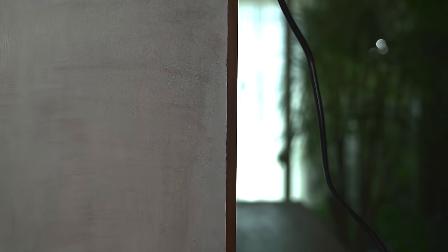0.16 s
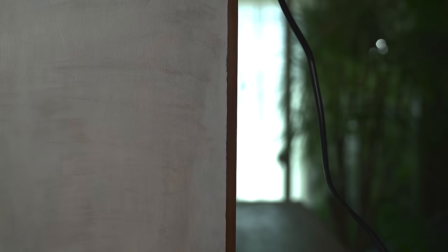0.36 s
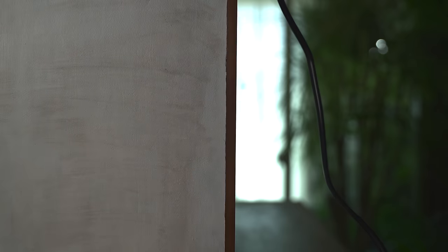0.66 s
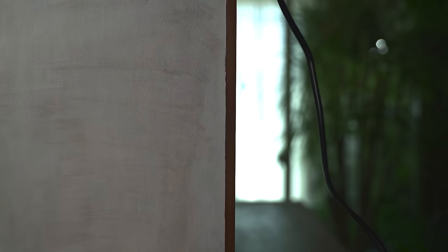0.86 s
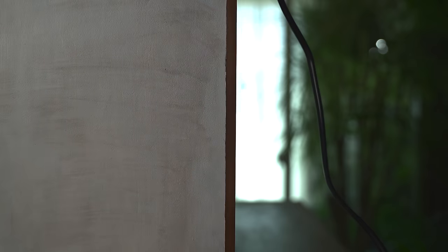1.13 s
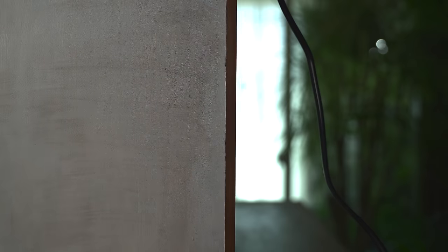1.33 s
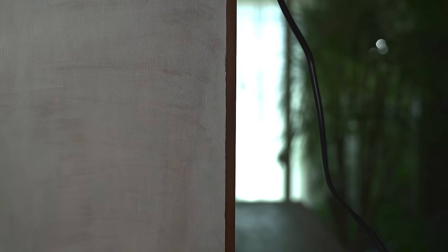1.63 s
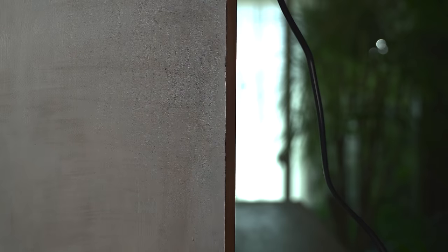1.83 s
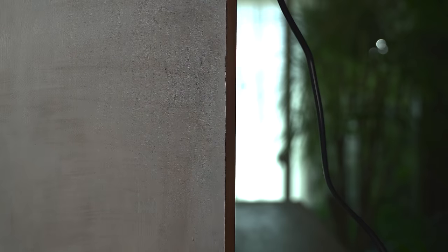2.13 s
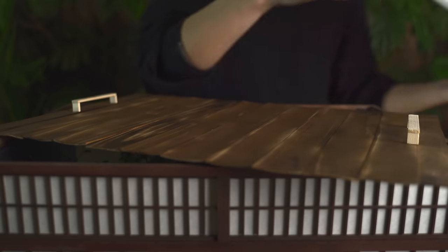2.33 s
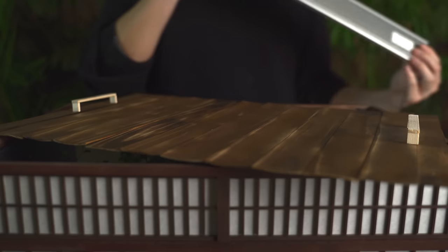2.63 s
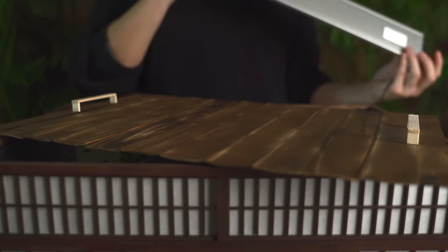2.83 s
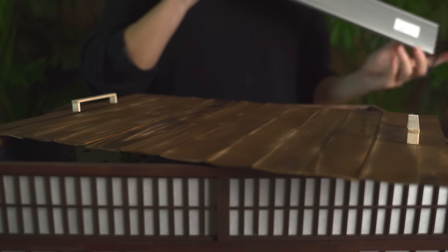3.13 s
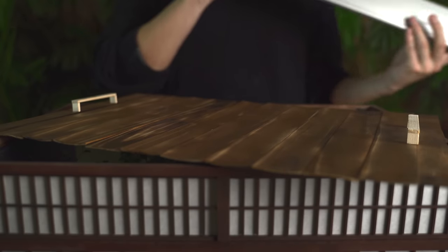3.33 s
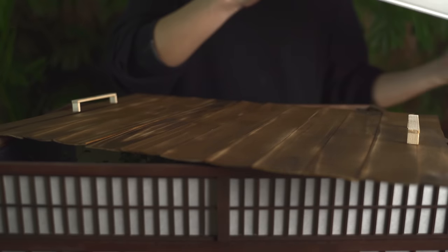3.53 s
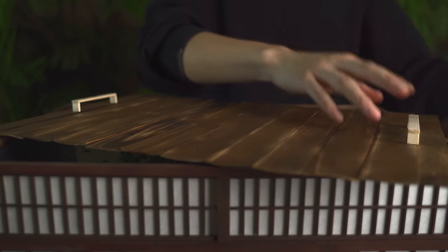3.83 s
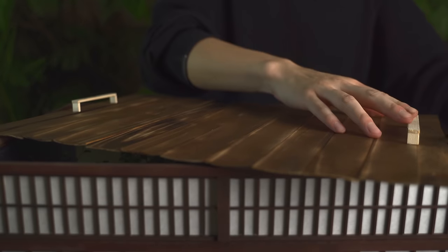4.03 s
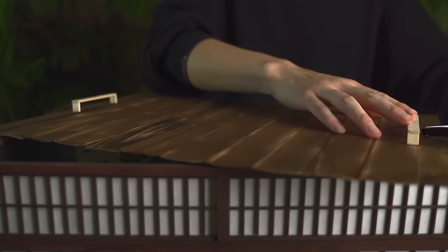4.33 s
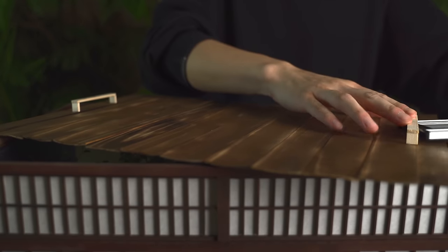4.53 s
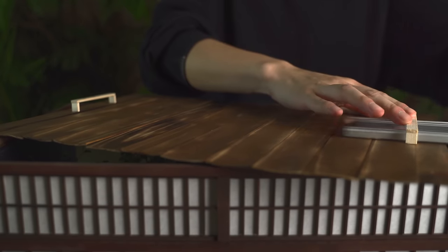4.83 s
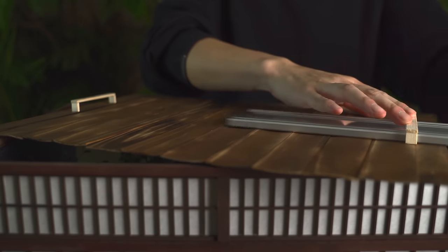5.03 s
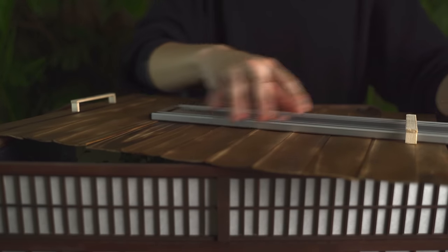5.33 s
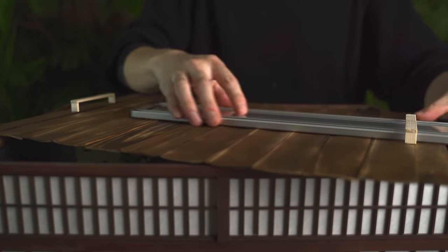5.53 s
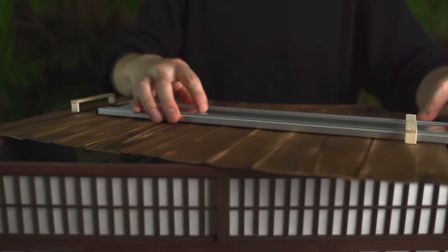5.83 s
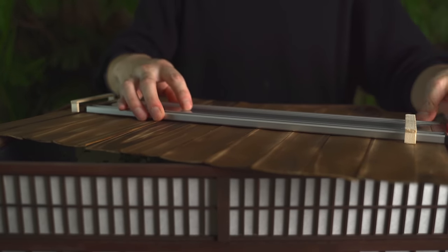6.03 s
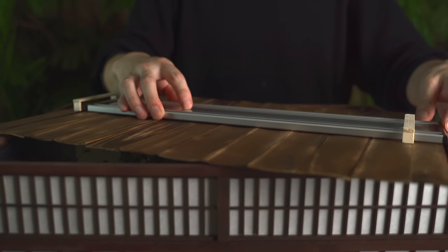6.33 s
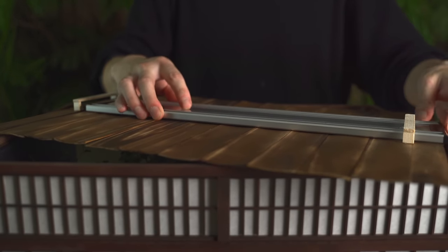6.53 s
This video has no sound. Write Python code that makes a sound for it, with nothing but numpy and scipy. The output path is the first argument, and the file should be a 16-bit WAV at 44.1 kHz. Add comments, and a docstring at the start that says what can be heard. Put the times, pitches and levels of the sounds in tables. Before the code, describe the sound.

A small wooden door rumbles to a knocking stop and rocks softly, then sleeves rustle and a light metal bar knocks and scrapes across thin planks.

```python
"""Wooden sliding door, then a lamp bar on planks

A small wooden door rumbles and rubs to its stop, knocks, and rocks in its groove in a small room.
Sleeves rustle as a light metal lamp bar is handled, set on a roof of thin planks and pushed along it.
Struck wood and metal are decaying modes plus sharp noisy contacts; sliding is noise from tiny slips.
The bar hisses, rasps and squeaks on the grain and knocks over the plank edges, above a quiet room tone.
"""
import sys
import numpy as np
from scipy import signal
from scipy.fft import rfft, irfft, next_fast_len
from scipy.io import wavfile
from scipy.ndimage import uniform_filter1d, map_coordinates

SR = 44100
rng = np.random.default_rng(int(sys.argv[2]) if len(sys.argv) > 2 else 0)


def waveform_to_disk(signal):
    """Save audio, clipped to [-1, 1], as 16-bit WAV at the path in sys.argv[1]."""
    frames = np.transpose(np.atleast_2d(signal))
    scaled = np.clip(frames, -1, 1) * 32767
    samples = np.round(scaled).astype(np.int16)
    wavfile.write(sys.argv[1], SR, samples)


N = 293706
TIME = np.arange(N) / SR  # seconds through the scene
AGE = TIME[:SR // 2]  # seconds since the start of a short sound

# The quiet room's tone. Each row: frequency in Hz, relative density in dB per Hz.
ROOM_TONE_SPECTRUM = [(12, -12), (20, -9), (49, -5), (101, -5), (177, 0), (293, -13.5), (357, -5.5),
                      (422, -14), (2670, -28), (3950, -26.5), (6720, -31.5), (13900, -31.5), (16000, -33)]
# How long the room rings. Each row: frequency in Hz, t60 in seconds.
ROOM_DECAY = [(150, 0.45), (400, 0.33), (1000, 0.4), (3500, 0.31), (7000, 0.32), (14000, 0.29)]
# The door runs in its groove. Each row: time in seconds, rumble in dB, rub in dB, both before their trims.
DOOR_RUN_LEVELS = [(0.0, -18, -36.5), (0.125, -21, -37.5), (0.155, -15, -44.5), (0.262, -30, -44.5),
                   (0.34, -44, -60), (0.42, -54, -72)]
# Colour of the door's and planks' rumble. Each row: frequency in Hz, relative density in dB per Hz.
RUMBLE_SPECTRUM = [(40, -55), (110, -29.5), (190, 3.5), (290, 2), (360, -2), (480, -2), (800, -10),
                   (1500, -17), (4000, -65.5)]
# Colour of the door's rub on its frame. Each row: frequency in Hz, relative density in dB per Hz.
RUB_SPECTRUM = [(400, -19), (1200, 5.5), (2500, -4.5), (4200, 1), (5500, -10.5), (8000, -19), (11000, -25),
                (16000, -34.5)]
# Door knocks. Each row: start in seconds, thud in dB, crack in dB relative to the thud, favoured pitch in Hz.
DOOR_KNOCKS = [(.044, -20.5, -31, 260), (.1345, -8.5, -16.5, 410), (.142, -17, -29, 250),
               (.16, -15, -29, 474), (.218, -18, -19, 398), (.232, -16.5, -31, 294), (.703, -30, -1.5, 400),
               (.709, -18.5, -23, 215)]
# Modes of the door. Each row: frequency in Hz, relative level in dB, t60 in seconds.
DOOR_MODES = [(221.5, -9, 0.13), (277, 8.5, 0.0077), (284, -2.5, 0.081), (351, -2, 0.028),
              (467, -2.5, 0.051), (570, -4.5, 0.048), (730, -3, 0.062)]
# Woody clack of door and roof. Each row: frequency in Hz, relative density in dB per Hz.
WOOD_CLACK = [(40, -65), (150, -27.5), (400, -2.5), (650, 7.5), (1100, 3.5), (1700, -3.5), (2500, -10),
              (4000, -37), (8000, -40)]
# Bright crack of the door. Each row: frequency in Hz, relative density in dB per Hz.
DOOR_CRACK = [(800, -47), (2000, -3), (2900, -3), (3400, 0.5), (4000, -4.5), (4600, -7), (5800, -14.5),
              (8000, -28.5), (11000, -29), (16000, -34.5)]
# Thin panels radiate little deep bass. Each row: frequency in Hz, gain in dB.
PANEL_RADIATION = [(20, -55), (70, -7), (125, -7.5), (185, 9), (1500, 9.5), (5000, -8.5)]
# Bouts of rocking. Each row: start in seconds, end in seconds, time between thumps in seconds,
# level in dB before side and scatter.
ROCKING_BOUTS = [(.436, .67, 0.096, -20), (.994, 1.58, .0922, -31), (1.617, 2.12, .091, -41)]
# The two sides the panel rocks onto in turn. Each row: level offset in dB, settled pitch in Hz before
# detuning, t60 in seconds.
ROCK_SIDES = [(0.5, 166, 0.11), (-4, 152.2, 0.13)]
# Faint dry ticks of the door frame. Each row: start in seconds, level in dB before the trim, pitch in Hz.
FRAME_TICKS = [(.487, -33.5, 1260), (.534, -42, 754), (1.449, -41, 795), (1.619, -36, 900)]
# Short scuffs of wood and fingers. Each row: start in seconds, length in seconds, level in dB.
SCUFFS = [(0.582, 0.095, -53.5), (0.683, 0.047, -38), (2.226, .06, -54.5), (3.953, 0.0696, -31),
          (4.438, 0.09, -31), (4.773, 0.037, -34), (4.856, 0.04, -26.5), (6.196, 0.067, -47),
          (6.32, 0.064, -27.5)]
# Colour of scuffs and cloth crackle. Each row: frequency in Hz, relative density in dB per Hz.
SCUFF_SPECTRUM = [(40, -35), (100, 5), (400, 8), (950, 10.5), (2000, 2.5), (2900, -1), (3900, 4),
                  (5500, -12.5), (8800, -9.5), (16000, -29.5)]
# Arm movements. Each row: fastest moment in seconds, half length in seconds, level in dB.
ARM_MOVES = [(2.0, .35, -66.5), (2.26, 0.17, -55), (2.57, 0.15, -51.5), (2.893, 0.13, -45),
             (3.065, 0.067, -42.5), (3.296, 0.19, -49), (3.695, 0.2, -50.5), (3.997, 0.14, -43),
             (4.405, 0.062, -40.5), (6.473, 0.33, -48)]
# Colour of rustling cloth. Each row: frequency in Hz, relative density in dB per Hz.
CLOTH_SPECTRUM = [(40, -26), (120, -1.5), (250, 4.5), (500, 4), (1000, -0.5), (1700, -4), (3000, -3),
                  (4400, 0), (5700, -12.5), (8500, -18.5), (12000, -25.5), (16000, -37)]
# Soft bumps of an arm. Each row: start in seconds, length in seconds, level in dB.
ARM_BUMPS = [(2.91, 0.078, -50)]
# Dull colour of those bumps. Each row: frequency in Hz, relative density in dB per Hz.
BUMP_SPECTRUM = [(25, -19), (65, 2), (120, -1), (200, -22), (800, -60)]
# Lamp bar clicks. Each row: start in seconds, thud in dB, crack in dB relative to the thud, favoured pitch in Hz.
BAR_CLICKS = [(2.403, -36, 3, 1620), (2.407, -28.5, -4, 1190), (2.539, -45.5, 3.5, 1400),
              (3.156, -38, -7, 1000), (3.189, -35, 6, 580), (3.298, -46, 14.5, 1670),
              (3.357, -46, -4, 1100), (3.496, -38, -20, 1100), (3.537, -43, 5, 1340),
              (3.948, -14, -6.5, 515), (5.97, -37.5, 11.5, 1380), (6.213, -48, 12, 690)]
# Modes of the bar and the wood. Each row: frequency in Hz, relative level in dB, t60 in seconds.
BAR_MODES = [(435, 13, 0.03), (545, 4.5, 0.062), (607, 11, 0.047), (1013, -2, 0.055), (1054, 18.5, 0.016),
             (1265, -19, 0.023), (1752, 2, 0.069)]
# Clack of the bar. Each row: frequency in Hz, relative density in dB per Hz.
BAR_CLACK = [(150, -44), (450, -2), (850, 2.5), (1200, 6.5), (1800, -4), (2500, -8), (4000, -13.5),
             (8000, -23.5)]
# Crack of the bar's metal shell. Each row: frequency in Hz, relative density in dB per Hz.
BAR_CRACK = [(800, -18), (1800, -9), (2600, -0.5), (3100, 1), (3700, 4.5), (4450, 3), (5500, -9.5),
             (7500, -9.5), (11000, -25), (16000, -36)]
# Roof knocks. Each row: start in seconds, thud in dB, crack in dB relative to the thud, favoured pitch in Hz.
ROOF_KNOCKS = [(3.946, -13.5, -23, 580), (3.977, -22, -8, 300), (4.218, -12.5, -16.5, 545),
               (4.241, -19, -21, 580), (4.453, -20, -12, 444), (4.487, -12.5, -12.5, 286),
               (4.682, -22, -14, 356), (4.749, -22, -16.5, 397), (4.87, -17.5, -7, 422),
               (4.959, -12, -4, 360), (4.98, -17.5, -23, 380), (5.041, -25, -25, 192),
               (5.095, -25.5, -21, 417), (5.174, -20.5, -16, 501), (5.186, -12, -26, 457),
               (5.302, -8, -15.5, 447), (5.323, -7.5, -19, 245), (5.412, -31, -3, 600),
               (5.535, -12.5, -12.5, 600), (5.581, -16, -15, 202), (5.598, -21, -7.5, 295),
               (5.753, -34, -9, 300), (5.823, -20.5, -2.5, 223), (6.056, -16, -9.5, 222),
               (6.299, -32.5, -18.5, 170), (6.473, -36.5, -25, 257)]
# Modes of the plank roof. Each row: frequency in Hz, relative level in dB, t60 in seconds.
ROOF_MODES = [(144, -7, 0.49), (172, -0.5, 0.35), (213.7, 3, 0.077), (240, -6, 0.28), (298, 5.5, 0.091),
              (343, -5, 0.13), (403.7, -5, 0.11), (477, 8.5, 0.051), (543.4, 0, 0.032), (669, -23, 0.047),
              (861, -4.5, 0.16), (1140, -29, 0.27), (1516, -1, 0.087)]
# Bright crack of the roof. Each row: frequency in Hz, relative density in dB per Hz.
ROOF_CRACK = [(800, -29.5), (2200, 1), (3000, -1), (3700, 8), (4500, -2.5), (5500, -14.5), (7500, -7),
              (11000, -19), (16000, -19)]
# The bar slides. Each row: time in seconds, hiss in dB before its trim.
SLIDE_LEVELS = [(4.33, -97), (4.416, -55), (4.458, -28.5), (4.482, -31.5), (4.508, -51.5), (4.74, -46.5),
                (4.786, -28), (4.918, -32.5), (4.98, -24.5), (5.266, -29.5), (5.4, -38), (5.442, -27),
                (5.466, -35.5), (5.498, -30.5), (5.81, -40.5), (5.82, -35), (5.888, -37.5), (6.056, -37),
                (6.082, -56), (6.17, -72.5)]
# Colour of the sliding hiss. Each row: frequency in Hz, relative density in dB per Hz.
HISS_SPECTRUM = [(2000, -25), (3200, -9), (3850, 6), (4600, 2), (5500, 1), (7000, 4), (8200, 8), (8800, 9),
                 (9400, 4), (11000, 1), (12400, 1), (14000, -4.5), (16000, -14)]
# Rasp in the bar's resonance. Each row: frequency in Hz, relative density in dB per Hz.
RASP_SPECTRUM = [(300, -11.5), (900, 6), (1500, 1.5), (2700, 2), (3300, 7.5), (3850, 8.5), (4400, 3.5),
                 (5200, -8), (9000, -26)]
# The bar sticks and squeaks. Each row: start in seconds, length in seconds, start pitch in Hz,
# end pitch in Hz, level in dB.
SQUEAKS = [(4.42, 0.07, 3740, 4090, -35), (4.429, 0.034, 3160, 3240, -35.5),
           (4.441, 0.045, 6460, 8500, -34), (4.442, 0.012, 9300, 10500, -36.5),
           (4.775, 0.058, 4250, 3640, -27.5), (4.846, .035, 3590, 3760, -22),
           (4.858, 0.0316, 3260, 2560, -28), (5.009, 0.03, 3650, 3900, -30), (5.971, .06, 3460, 4270, -30)]

BLOW_DB, SPOT_HZ = -17, 424  # a middling blow, and the favoured pitch of a middling spot
CLACK_DB_PER_OCTAVE = 4.5  # spots with a higher favoured pitch clack more
ROCK_SAG, ROCK_SAG_S = 0.064, 0.026  # share a thump starts sharp, time constant of its settling in s
CRACKLES_PER_S, CRACKLE_DB = 45, -6  # snaps of cloth folds; level relative to the rustle
CRUISE_DB = -29.5  # slide level, before its trim, that counts as a steady push
RASP_GROWS, RUMBLE_GROWS = 0.44, 0.25  # dB gained for each dB of hiss
TOP_HZ = 15950  # band limit


def amp(db):
    """Decibels to gain."""
    return 10 ** (np.asarray(db) / 20)


def unit(x):
    """Scale to rms 1."""
    return x / np.sqrt(np.mean(x ** 2) + 1e-20)


def burst(x):
    """Scale a short sound to the energy of 10 ms at rms 1."""
    return x / np.sqrt(np.sum(x ** 2) / (SR * .01) + 1e-20)


def along(points, hz):
    """Read (Hz, value) points on a log frequency axis."""
    f, v = np.transpose(points)
    return np.interp(np.log(hz + 1), np.log(f), v)


def gains(rows):
    """Draw one smoothed gain curve for each dB column, silent outside the rows."""
    s, *columns = np.transpose(rows)
    active = (TIME > s[0] - .03) * (TIME < s[-1] + .03)
    return [uniform_filter1d(amp(np.interp(TIME, s, db)) * active, size=200) for db in columns]


def fade(t60):
    """Exponential decay, 60 dB down after t60 seconds."""
    return np.exp(-np.log(1000) * AGE / max(t60, 1e-3))


def stroke(length, edge):
    """A short envelope with soft edges, both times in seconds."""
    return np.clip(AGE / edge, 0, 1) * np.clip((length - AGE) / edge, 0, 1)


def wobble(rate):
    """A smooth random curve, rate knots a second."""
    knots = rng.standard_normal(int(N * rate / SR) + 4)
    return map_coordinates(knots, [TIME * rate])


def add(track, s, x):
    """Mix x into the track at s seconds."""
    part = track[max(round(s * SR), 0):][:len(x)]
    part += x[:len(part)]


def colour(x, spectrum):
    """Minimum-phase filter: it takes on the spectrum without sounding ahead of its input."""
    m = 2 * next_fast_len(len(x) // 2 + 4096)
    magnitude = amp(along(spectrum, np.fft.rfftfreq(m, 1 / SR)))
    cepstrum = irfft(np.log(magnitude), m)
    # fold the cepstrum onto positive time
    cepstrum[1:m // 2] *= 2
    cepstrum[m // 2 + 1:] = 0
    return irfft(rfft(x, m) * np.exp(rfft(cepstrum)), m)[:len(x)]


def room(x):
    """The small room's answer: decaying noise of unit energy, each band fading at its own rate."""
    hz, t, z = signal.stft(rng.standard_normal(SR // 2), SR, nperseg=256)
    decay = np.exp(-np.log(1000) * t / along(ROOM_DECAY, hz)[:, None])
    tail = signal.istft(z * decay, SR, nperseg=256)[1][:len(AGE)]
    tail = tail * (1 - np.exp(-(AGE / 0.0088) ** 2))  # the walls take a moment to answer
    return signal.fftconvolve(x, tail / np.linalg.norm(tail))[:len(x)]


def friction(spectrum, slips, spread_db, patchy_db):
    """Tiny uneven slips, so many a second, over steady noise; their resonances drift in patches; rms 1."""
    slipping = rng.random(N) < slips / SR
    strength = amp(spread_db * np.clip(rng.standard_normal(N), -2, 2))
    grains = slipping * rng.standard_normal(N) * strength
    z = signal.stft(unit(grains) + 1.92 * rng.standard_normal(N), nperseg=512)[2]
    # smooth random gains across frequency, then across time
    patches = uniform_filter1d(rng.standard_normal(z.shape), size=4, axis=0)
    patches = uniform_filter1d(patches, size=9, axis=1)
    patchy = signal.istft(z * amp(patchy_db * unit(patches)), nperseg=512)[1][:N]
    return unit(colour(patchy, spectrum))


def contact(spectrum, t60, chatter):
    """One sharp push with a brief decaying chatter behind it."""
    push = chatter * unit(rng.standard_normal(len(AGE)) * fade(t60)) / np.sqrt(len(AGE))
    push[0] += 1
    return burst(colour(push, spectrum))


def ring(modes, favoured_hz, focus_db):
    """The modes of a struck body start together; the spot that is hit favours those near its pitch."""
    swing = np.zeros(len(AGE))
    for hz, level, t60 in modes:
        scatter_db, detune = rng.normal(0, 1.5), rng.normal(1, .01)
        spot_db = -focus_db * abs(np.log2(hz / favoured_hz))  # focus_db is the loss per octave
        gain = amp(level + spot_db + scatter_db)
        swing += gain * fade(t60) * np.sin(2 * np.pi * hz * detune * AGE)
    return burst(colour(swing, PANEL_RADIATION))


def knocks(rows, modes, clack_spectrum, crack_spectrum, focus_db, clack_db, clack_grows,
           room_db, clack_t60, crack_t60, chatter, top_per_db):
    """Each blow rings the body; a clack and the top end vary with force, a crack lies on top, the room answers."""
    track = np.zeros(N)
    for s, db, crack_db, favoured_hz in rows:
        force_db = db - BLOW_DB
        thud = ring(modes, favoured_hz, focus_db)
        spot_db = CLACK_DB_PER_OCTAVE * np.log2(favoured_hz / SPOT_HZ)
        clack_gain = amp(clack_db + clack_grows * force_db + spot_db)
        crack_gain = amp(crack_db)
        clack = clack_gain * contact(clack_spectrum, clack_t60, chatter)
        crack = crack_gain * contact(crack_spectrum, crack_t60, chatter)
        # the room is fed the bare pushes, without chatter
        diffuse = room(thud + clack_gain * contact(clack_spectrum, clack_t60, 0))
        diffuse = diffuse + room(crack_gain * contact(crack_spectrum, crack_t60, 0))
        top_end = [(4500, 0), (14000, top_per_db * force_db)]
        add(track, s, amp(db) * colour(thud + clack + crack + amp(room_db) * diffuse, top_end))
    return track


def room_tone():
    """Steady coloured noise: low rumble and faint hiss of the quiet room."""
    return amp(-56.5) * unit(colour(rng.standard_normal(N), ROOM_TONE_SPECTRUM))


def door_run():
    """The door rumbles in its groove and rubs along the frame, both as friction noise."""
    rumble_gain, rub_gain = gains(DOOR_RUN_LEVELS)
    rumble = rumble_gain * friction(RUMBLE_SPECTRUM, slips=1200, spread_db=2.0, patchy_db=3.0)
    rub = rub_gain * friction(RUB_SPECTRUM, slips=2500, spread_db=0.5, patchy_db=4.5)
    return amp(-5.5) * rumble + amp(3.0) * rub


def door_knocks():
    """Blows ring the wooden door's short modes."""
    return knocks(DOOR_KNOCKS, DOOR_MODES, WOOD_CLACK, DOOR_CRACK, focus_db=11.5, clack_db=-10.5,
                  clack_grows=0.089, room_db=-5.5, clack_t60=0.024, crack_t60=0.025,
                  chatter=3.3, top_per_db=-0.32)


def door_rocking():
    """The loose panel rocks side to side in soft low thumps, ten or eleven a second, each sagging in pitch."""
    track = np.zeros(N)
    for start, end, period, db in ROCKING_BOUTS:
        for k, s in enumerate(np.arange(start, end, period)):
            side_db, hz, t60 = ROCK_SIDES[k % 2]
            scatter_db, detune = rng.normal(0, 1), rng.normal(1, .02)
            pitch = hz * detune * (1 + ROCK_SAG * np.exp(-AGE / ROCK_SAG_S))
            phase = 2 * np.pi * np.cumsum(pitch) / SR
            panel = np.sin(phase) * fade(t60) * (1 - np.exp(-AGE / 0.0028))
            sway = np.sin(2 * np.pi * 85 * AGE) * fade(0.052) * (1 - np.exp(-AGE / 0.0048))
            add(track, s, amp(db + side_db + scatter_db) * (panel + amp(-2.0) * sway))
    return track + amp(-9) * room(track)


def door_ticks():
    """The door frame ticks faintly: dry contacts in a band around each pitch."""
    track = np.zeros(N)
    for s, db, hz in FRAME_TICKS:
        # as read by along, the band steps up at a quarter of the pitch
        band = [(hz / 4, -25), (hz / 6.6, -7), (hz, 0), (hz * 1.11, -7), (hz * 3, -35)]
        add(track, s, amp(db - 14.5) * contact(band, t60=0.027, chatter=0.92))
    return track + amp(-9) * room(track)


def scuffs():
    """Wood and fingers scuff broadly: short strokes of grainy noise."""
    track = np.zeros(N)
    for s, length, db in SCUFFS:
        grain = rng.standard_normal(len(AGE)) * rng.standard_normal(len(AGE))
        add(track, s, amp(db) * stroke(length, edge=0.0041) * unit(colour(grain, SCUFF_SPECTRUM)))
    return track + amp(-8.5) * room(track)


def sleeves():
    """Cloth friction swells and ebbs with each arm movement; folds crackle, and an arm bumps dully."""
    power = sum(amp(db) ** 2 * np.exp(-2 * ((TIME - s) / half) ** 2) for s, half, db in ARM_MOVES)
    folds = (rng.random(N) < CRACKLES_PER_S / SR) * rng.uniform(-0.59, 1, N)
    snap = contact(SCUFF_SPECTRUM, t60=0.032, chatter=1)
    crackle = unit(signal.fftconvolve(folds, snap)[:N])
    rustle = friction(CLOTH_SPECTRUM, slips=4100, spread_db=4.0, patchy_db=-2.5)
    rustle = amp(1.55 * wobble(25)) * rustle
    track = np.sqrt(power) * (rustle + amp(CRACKLE_DB) * crackle)
    for s, length, db in ARM_BUMPS:
        bump = unit(colour(rng.standard_normal(len(AGE)), BUMP_SPECTRUM))
        add(track, s, amp(db) * stroke(length, edge=0.023) * bump)
    return track


def bar_clicks():
    """Light blows ring the metal bar's modes."""
    return knocks(BAR_CLICKS, BAR_MODES, BAR_CLACK, BAR_CRACK, focus_db=19, clack_db=-3.5,
                  clack_grows=-0.029, room_db=-2, clack_t60=0.037, crack_t60=0.048,
                  chatter=4.9, top_per_db=0.21)


def roof_knocks():
    """The bar knocks on the roof and over its plank edges, ringing the thin planks."""
    return knocks(ROOF_KNOCKS, ROOF_MODES, WOOD_CLACK, ROOF_CRACK, focus_db=8.5, clack_db=-6.5,
                  clack_grows=0.12, room_db=-11, clack_t60=0.056, crack_t60=0.025,
                  chatter=2.64, top_per_db=-.1)


def bar_slide():
    """Metal on wood grain: one push drives a hiss, a rasp in the bar, a rumble and small ticks in the planks."""
    hiss_gain, = gains(SLIDE_LEVELS)
    push = np.abs(hiss_gain) / amp(CRUISE_DB)  # 1 at a steady push
    touching = push > 1e-4
    rasp_drive = touching * push ** RASP_GROWS
    rumble_drive = touching * push ** RUMBLE_GROWS
    pressure = amp(1.3 * wobble(45) + 1.0 * wobble(220))  # stick and slip
    hiss = amp(-1.0) * hiss_gain * friction(HISS_SPECTRUM, slips=6900, spread_db=3, patchy_db=3.0)
    rasp = amp(-32) * rasp_drive * friction(RASP_SPECTRUM, slips=4200, spread_db=-4.5, patchy_db=1.0)
    # ridges of the grain tap the planks, 110 a second on average
    ridges = (rng.random(N) < 110 / SR) * rng.uniform(-1.55, 1, N)
    tap = ring(ROOF_MODES, favoured_hz=503, focus_db=14)
    tap = tap + amp(-5.0) * contact(WOOD_CLACK, t60=0.038, chatter=0.12)
    ticks = amp(-38.5) * signal.fftconvolve(ridges * rasp_drive, tap)[:N]
    rumble = amp(-38) * rumble_drive * friction(RUMBLE_SPECTRUM, slips=2800, spread_db=8, patchy_db=6)
    return pressure * (hiss + rasp) + ticks + rumble


def squeaks():
    """Where the bar catches it squeaks: a gliding sine blurred by noise into a narrow band."""
    track = np.zeros(N)
    blur_spectrum = [(120, -0.5), (400, -7.5), (1500, -48), (4000, -44)]
    for s, length, start_hz, end_hz, db in SQUEAKS:
        pitch = np.interp(AGE, [0, length], [start_hz, end_hz])
        phase = 2 * np.pi * np.cumsum(pitch) / SR
        blur = colour(rng.standard_normal(len(AGE)), blur_spectrum)  # uneven slips widen the line
        add(track, s, amp(db) * stroke(length, edge=0.0016) * unit(blur * np.sin(phase)))
    return track + amp(-8.5) * room(track)


def scene():
    """Mix room, door, sleeves, lamp bar and roof to one channel."""
    door = door_run() + door_knocks() + door_rocking() + door_ticks()
    handling = scuffs() + sleeves() + bar_clicks()
    on_roof = roof_knocks() + bar_slide() + squeaks()
    return (room_tone() + door + handling + on_roof)[None]


def record(dry):
    """The hardest knocks flatten smoothly towards full scale; nothing is kept above the band limit."""
    held = dry / (1 + np.abs(dry) ** 6) ** (1 / 6)
    m = next_fast_len(N + SR // 2)
    in_band = np.fft.rfftfreq(m, 1 / SR) < TOP_HZ
    return irfft(rfft(held, m) * in_band, m)[..., :N]


dry = scene()
out = record(dry)
waveform_to_disk(out)
```